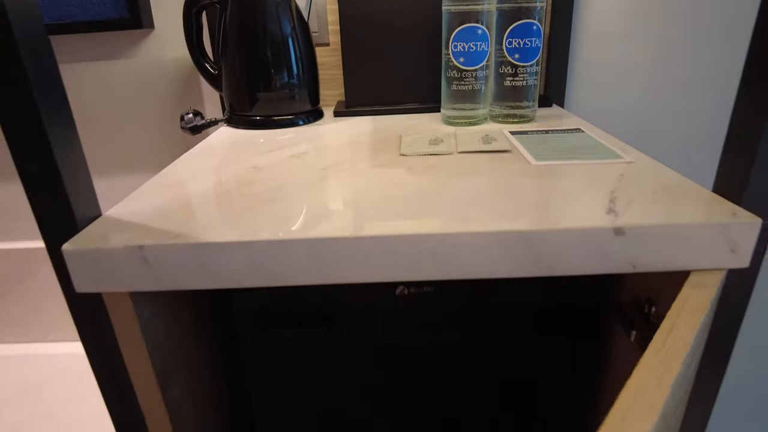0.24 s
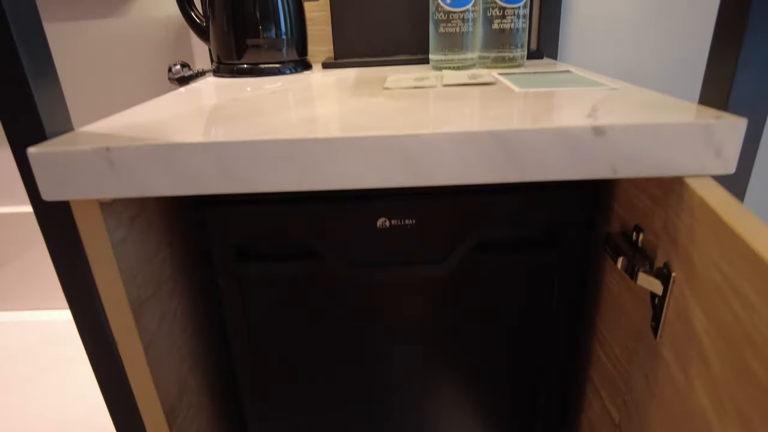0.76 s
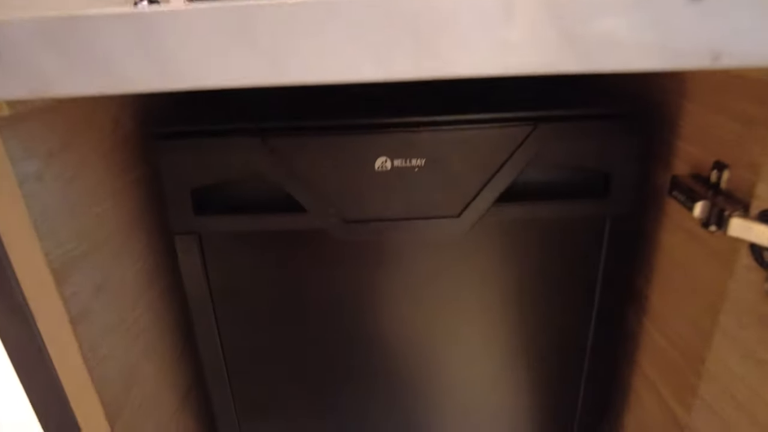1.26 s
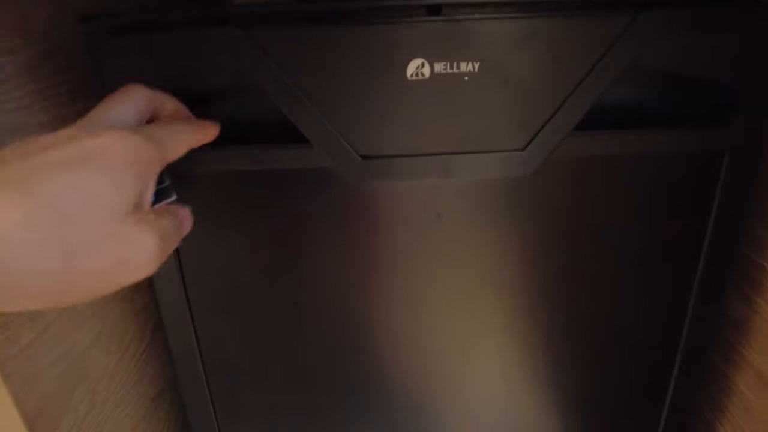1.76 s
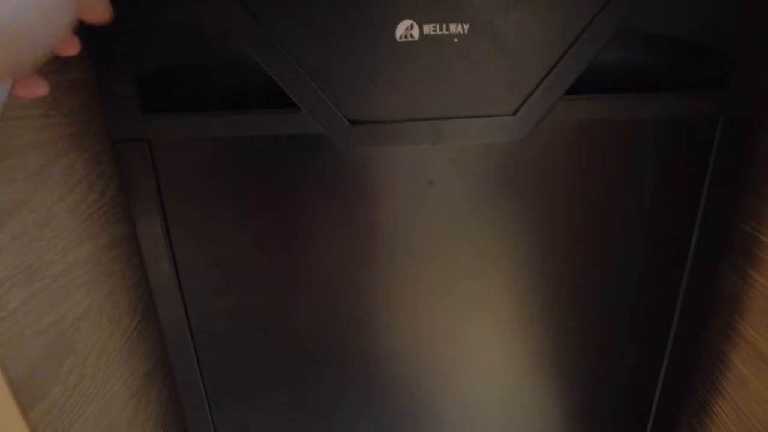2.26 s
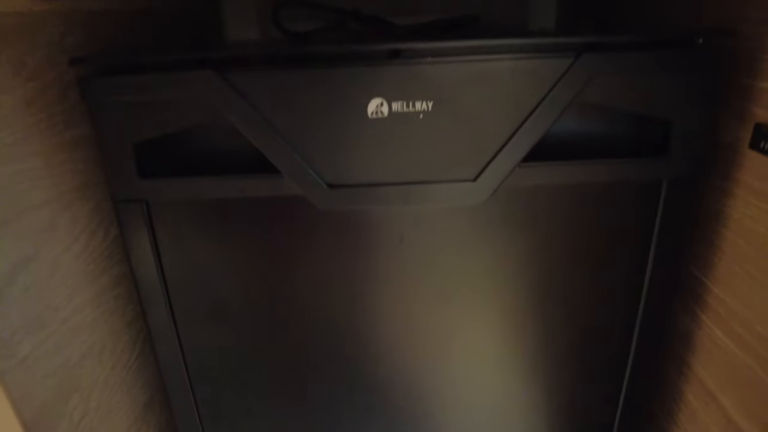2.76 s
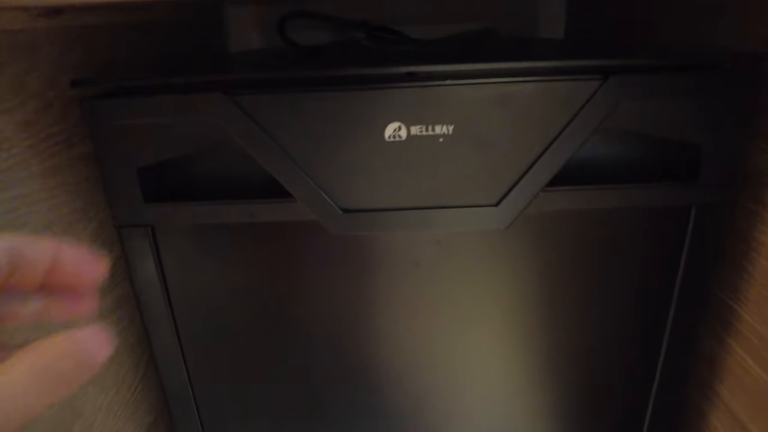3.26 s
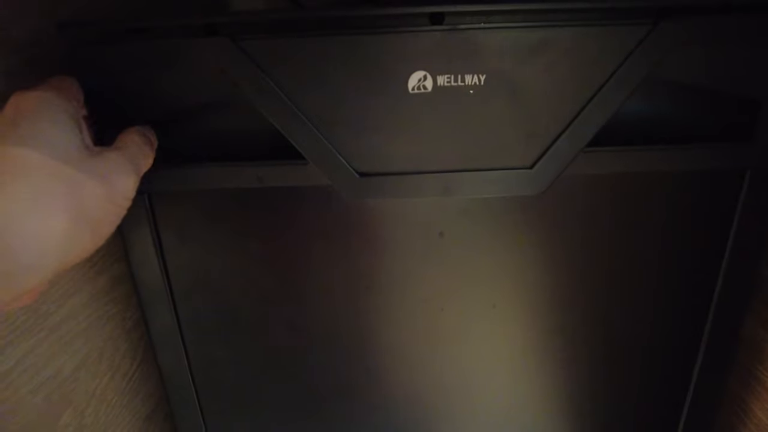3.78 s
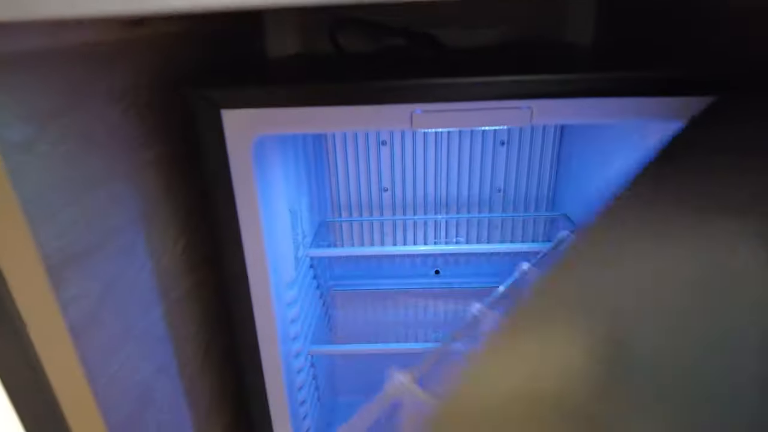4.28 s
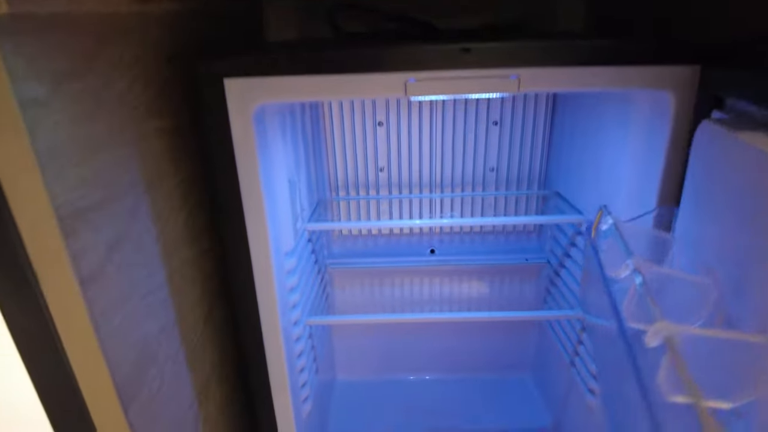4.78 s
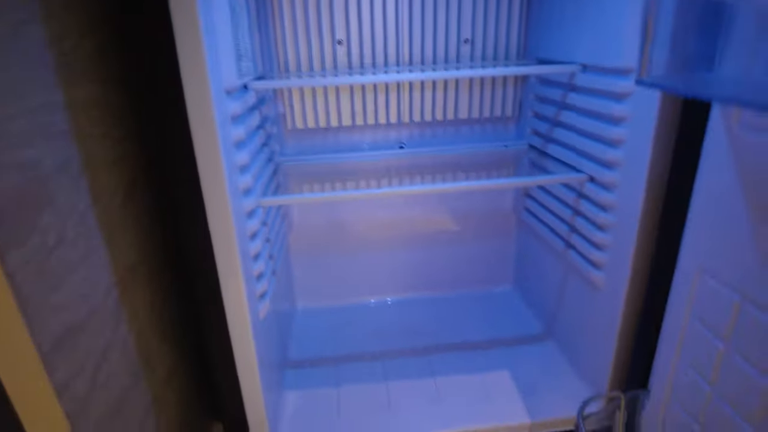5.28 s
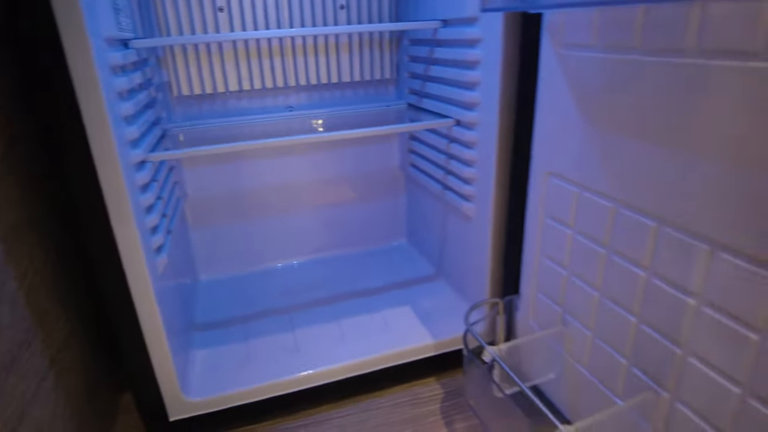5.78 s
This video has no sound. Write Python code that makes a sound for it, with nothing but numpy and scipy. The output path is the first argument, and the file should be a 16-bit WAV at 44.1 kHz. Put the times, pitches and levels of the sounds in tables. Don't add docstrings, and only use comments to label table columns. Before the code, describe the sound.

A hand fumbles at a small fridge in a wooden cabinet: hollow thuds, plastic clicks and short scrapes over low ventilation rumble.

```python
import sys
import numpy as np
from scipy import signal
from scipy.io import wavfile
from scipy.ndimage import uniform_filter1d

SR = 44100
rng = np.random.default_rng(int(sys.argv[2]) if len(sys.argv) > 2 else 0)


def boost(x):
    u = np.asarray(x, float) / 20
    return 10 ** u


def unload_audio(sound):
    columns = np.transpose(np.atleast_2d(sound))
    steps = np.round(np.clip(columns, -1, 1) * 32767)
    wavfile.write(sys.argv[1], SR, steps.astype(np.int16))


N = 266220

# [f/Hz, width/Hz, level/dB]
GRIP = [(1240, 176, 3), (1653, 310, 2.5), (2183, 153, 0), (2360, 240, -2), (2830, 500, -2.5),
        (3590, 350, -6), (4354, 360, -3.5), (5940, 570, -1.5), (8650, 1050, -11)]
# [f/Hz, likeness 0-1]
LIKENESS = [(30, 0.98), (125, .98), (300, 0.86), (600, 0.2), (1200, 0.4), (2500, 0.52), (5000, 0.2),
            (15000, 0)]


def level(x, db):
    return x * boost(db) / np.sqrt(np.mean(x ** 2))


def peak(x, db):
    return x * boost(db) / np.max(np.abs(x))


def on_log(hz, table):
    f_hz, value = np.transpose(table)
    return np.interp(np.log(hz), np.log(f_hz), value)


def curves(table):
    s, *columns = np.transpose(table)
    return (np.interp(np.arange(N) / SR, s, c) for c in columns)


def band(x, hz, width_hz):
    return signal.lfilter(*signal.iirpeak(min(hz, 0.45 * SR), hz / width_hz, fs=SR), x)


def cut(x, low_hz, high_hz):
    edges_hz = [low_hz, min(high_hz, 0.45 * SR)]
    return signal.sosfilt(signal.butter(2, edges_hz, "bandpass", fs=SR, output="sos"), x)


def body(force, modes):
    return sum((-1) ** k * boost(db) * band(force, hz, width_hz)
               for k, (hz, width_hz, db) in enumerate(modes))


def alike(x, likeness):
    c = np.clip(likeness, -0.99, 0.99)
    return np.sqrt(1 + c) * x[0] + np.sqrt(1 - c) * x[1] * np.array([[1], [-1]])


def walk(rate_hz):
    hold = int(SR / rate_hz)
    steps = rng.standard_normal(N // 256)[np.arange(N) // hold]
    return 2.93 * uniform_filter1d(uniform_filter1d(steps, hold), hold)


def fade(t, t60_s):
    return np.exp(-np.log(1000) * t / max(t60_s, 0.003))


def swells(s, db, fade_s, rise):
    t = np.arange(0, N / SR, 0.001)[:, None]
    away_s = np.maximum(t - s, (s - t) / rise)
    each = boost(db - 20 * away_s / np.maximum(fade_s, 0.005))
    return np.interp(np.arange(N) / SR, t[:, 0], each.sum(axis=1))


def grains(rate_hz, spread_db):
    chance = rng.random((2, 2, N))
    jerks = chance[0] < rate_hz / SR
    size = boost(-spread_db * np.log(1 - 0.98 * chance[1]))
    return jerks * size * rng.choice([-1, 1], (2, N))


def add(out, s, x):
    i = int(s * SR)
    x = x[..., :N - i]
    out[:, i:i + x.shape[-1]] += x


def door(force):
    # [f/Hz, width/Hz, level/dB]
    panel_modes = [(136, 29.7, -6.5), (199, 13.7, -1.5), (248, 15.7, -8), (304.6, 32.8, -3), (401, 50, -7),
                   (500, 44, -11), (590, 71, -14.5), (724, 36, -17), (842, 38, -15)]
    return sum((-1) ** k * boost(db) * alike(band(force, hz, width_hz), on_log(hz, LIKENESS))
               for k, (hz, width_hz, db) in enumerate(panel_modes))


def thuds():
    # [t/s, boom/dB, panel f/Hz, panel/dB, boom t60/s]
    blows = [(0.0, -47, 139, -55, 0.12), (0.56, -48, 190, -50, 0.085), (1.342, -26.5, 240, -39.5, 0.25),
             (1.567, -31, 250, -53, 0.14), (1.608, -34, 178, -53, 0.16), (1.81, -16.5, 202, -34.5, 0.08),
             (1.824, -23, 255, -39, 0.07), (1.973, -44, 202, -45.5, 0.24), (2.01, -41, 283, -42.5, 0.042),
             (2.195, -62, 223, -42.5, 0.091), (2.298, -35.5, 202, -55.5, 0.08),
             (2.494, -27, 248, -47.5, 0.12), (2.939, -56, 176, -51, 0.04), (3.531, -34.5, 199, -65, 0.056),
             (3.63, -34.5, 214, -52.5, 0.086), (3.818, -36, 202, -45, 0.082),
             (3.894, -35, 199, -36.5, 0.21), (3.935, -44, 195, -41, 0.2), (3.978, -45, 270, -45, 0.085),
             (4.079, -52, 207, -54, 0.15), (5.748, -35, 184, -44, 0.062), (5.768, -37, 194, -49.5, 0.24),
             (1.842, -34, 193, -41, .25)]
    out, t = np.zeros((2, N)), np.arange(SR // 2) / SR
    for s, boom_db, panel_hz, panel_db, t60_s in blows:
        boom_hz = 66.6 * 0.72 ** np.log2(t60_s * 10)
        boom = np.sin(2 * np.pi * boom_hz * t) * fade(t, t60_s) * (1 - np.exp(-t / 0.0011))
        shake = uniform_filter1d(rng.standard_normal((2, len(t))), 20)
        shake = shake * fade(t, 0.44 * t60_s) * (1 - np.exp(-t / 0.0043))
        panel = 2.2 * band(shake[0], panel_hz, 35) + door(shake)
        add(out, s + 0.003065, peak(boom, boom_db) + peak(panel, panel_db + 10))
    return out


def rubbing():
    # [t/s, effort/dB]
    hands = [(0, -67), (.5, -64.5), (.8, -65), (1.1, -60.5), (1.3, -67.5), (1.8, -64), (2.3, -66),
             (2.7, -65.5), (3.1, -64), (3.5, -69.5), (3.75, -61.5), (4.3, -72), (4.7, -68.5), (5.0, -77.5),
             (5.4, -73.5), (5.7, -70.5), (6.04, -72)]
    # [t/s, effort/dB, time to fade 20 dB/s]
    slips = [(1.834, -46, .12), (1.885, -48, .1), (1.972, -51, 0.08), (1.998, -49, 0.07),
             (2.023, -52, 0.07), (2.191, -55, 0.06), (2.329, -65, 0.02), (2.479, -57, -0.27),
             (2.96, -61.5, -0.16), (3.81, -58, 0.05), (3.852, -55.5, 0.04), (3.893, -50, .14),
             (3.939, -49, .14), (3.985, -61, 0.03), (4.03, -60, 0.02), (4.083, -51, .22), (4.16, -69, -0.1),
             (4.221, -62.5, 0.17), (1.36, -58.5, 0.1), (1.139, -64.5, -0.03), (5.77, -68.5, 0.8)]
    effort_db = 20 * np.log10(boost(*curves(hands)) + swells(*np.transpose(slips), rise=0.29))
    over_db = effort_db + 65
    shake_db, rumble_db = -54 + 1.055 * over_db, -50.5 + 0.8 * over_db

    scrape = alike(cut(body(grains(900, 1.47), GRIP), 870, 3680), 0.38)
    scrape = level(scrape, 0) * boost(effort_db + 0.7 * walk(30) - 4)
    shake = level(door(grains(600, 1.04)), 0) * boost(shake_db + 0.6 * walk(17) - 8)
    rumble = level(alike(cut(grains(300, 2.0), 23.4, 99), 0.97), 0) * boost(rumble_db - 6)
    return scrape + shake + rumble


def cloth():
    # [t/s, swish/dB, time to fade 20 dB/s, brightness/dB]
    brushes = [(0.0, -73, 0.8, 6), (.19, -59.5, 0.21, -1.5), (.57, -69, 0.2, -3), (.69, -63, 0.33, 0),
               (1.07, -62, 0.87, 3.5), (1.13, -55, -0.06, 22), (1.36, -54, -0.08, 3), (1.74, -68, .5, 0),
               (1.83, -50.5, 0.0328, 6), (1.9, -54.5, 0, -9), (1.979, -55, 0.11, 3), (2.15, -57.5, 0.08, 1),
               (2.37, -73, 0.15, 15), (2.49, -71.5, 0.26, -3), (2.69, -63.5, 0.25, 0),
               (2.88, -59.5, 0.28, -2), (2.919, -48, 0.0262, 7), (2.961, -55.5, 0.0247, -9),
               (3.532, -55, -0.1, 20), (3.628, -59.5, 0.11, 4), (3.84, -62, .5, 10.5),
               (4.07, -80, -0.1, -1.5), (4.93, -90, 0.86, -8), (5.082, -62, 0.5, 5), (5.61, -82, 0.5, 18),
               (5.75, -71.5, 0.8, -3)]
    rise, rest_db = 0.39, -86
    s, db, fade_s, bright_db = np.transpose(brushes)
    fibres = grains(6000, 3.2)
    dull = level(alike(cut(fibres, 2930, 9480), 0.053), -5)
    bright = level(alike(cut(fibres, 6700, 16050), 0.029), -7.5)
    dull_gain = boost(rest_db) + swells(s, db - bright_db / 2, fade_s, rise)
    bright_gain = boost(rest_db) + swells(s, db + bright_db / 2, fade_s, rise)
    return dull * dull_gain + bright * bright_gain


def air():
    # [f/Hz, density/dB per Hz]
    spectrum = [(12, -30), (20, 6), (38, 4), (70, -6.5), (138, -10), (310, -17.5), (347, -17), (388, -20.5),
                (624, -30), (780, -28.5), (1090, -31), (1190, -53), (1480, -36), (3440, -55), (16000, -51)]
    # [t/s, level/dB]
    shelter = [(0, 1.5), (2.5, 1.5), (3.3, 0), (4.5, 4), (5.1, -0.5), (5.6, -0.5), (6.04, 2.5)]
    out, swell_db = 0, 0.4 * walk(0.7)
    for hz in 22 * 2 ** np.arange(0, 9.6, 0.5):
        noise = band(band(rng.standard_normal((2, N)), hz, hz / 2), hz, hz / 2)
        gain = boost(on_log(hz, spectrum) + swell_db + 1.25 * walk(8))
        out = out + gain * alike(noise, on_log(hz, LIKENESS))
    return level(out, -49.5) * boost(*curves(shelter))


def clicks():
    # [t/s, peak/dB, ring f/Hz, treble
    # crack/dB, ring over rattle/dB]
    contacts = [(0.176, -36, 1580, -52, -8), (0.56, -40.5, 570, -58, -1.5), (1.163, -48, 1670, -54, 9),
                (1.351, -40, 1280, -54, 5.5), (1.829, -28, 1240, -46.5, -7), (1.994, -40.5, 592, -72, 3),
                (2.132, -44.5, 640, -66, 7.5), (2.186, -40, 1590, -61, 12.5), (2.199, -49, 960, -71, 14),
                (2.244, -53, 595, -59, 4), (2.356, -47.5, 1620, -67, 10), (2.464, -54, 1510, -84, 10),
                (2.501, -57, 1450, -86, 11), (3.893, -35.5, 870, -57, -1), (3.954, -62, 595, -59, -4),
                (3.979, -54, 700, -77.5, -14), (4.027, -47, 1380, -57, -1), (4.085, -44, 1510, -76, 11),
                (4.129, -52, 680, -88, 16), (4.215, -49, 1370, -72, -5), (5.745, -40, 806, -70, -7.5),
                (5.764, -51, 770, -72, 16), (1.352, -43, 520, -77, 10), (3.85, -44.5, 1280, -72, 10),
                (1.4537, -46.5, 2850, -88, -4), (1.8127, -24, 2520, -39, 2), (1.847, -41, 2460, -65, 12),
             (1.8863, -34, 2320, -75, 4), (1.9678, -41, 2470, -68, 0), (2.027, -43, 2610, -65, 11),
             (2.148, -49, 2940, -72, 1), (2.4768, -52.5, 2180, -59, -20), (2.9112, -36.5, 1570, -36, 6),
             (2.9611, -45, 2360, -48, 8), (3.6306, -45.5, 2460, -54, 4.5), (3.808, -48.5, 2730, -56.5, 5),
             (3.8187, -47, 2150, -55, 2), (3.8489, -43, 2980, -53, -4), (3.934, -41.5, 2670, -62, 5.5),
             (4.08, -41.5, 2580, -59, 6.5), (4.77, -47.5, 3080, -77, 1), (4.918, -47, 4530, -59, 5.5),
             (4.9745, -73, 2410, -58.5, 3), (5.404, -54.5, 2750, -85, -2), (5.5933, -59.5, 1920, -66, -11),
             (5.7617, -46, 1980, -65, 7), (2.9122, -36, 2310, -45, 13.5), (5.7454, -44.5, 1960, -67, 0)]
    port_lag = 3
    out, t = np.zeros((2, N)), np.arange(SR // 4) / SR
    touch = 1 - np.exp(-t / 0.00019)
    for s, db, hz, crack_db, ring_db in contacts:
        t60_s = 0.059 * 0.68 ** np.log2(hz / 1000)
        force = rng.standard_normal((4, len(t))) * touch
        lump_db = 5 * rng.standard_normal(len(t) // 128 + 1)
        lumps = boost(np.repeat(lump_db, 128)[:len(t)])

        spot = band(band(force[0] * fade(t, 0.62 * t60_s), hz, 4.9 * hz), hz, 0.14 * hz)
        push = fade(t, 0.3 * t60_s) + 0.35 * lumps * fade(t, 1.6 * t60_s)
        grip = cut(body(force[1] * push, GRIP), 500, 12000)
        ring = peak(spot, db - 1.5 + ring_db / 2) + peak(grip, db - 2.5 - ring_db / 2)

        crack = alike(cut(force[2:], 4200, 17000), 0.45)
        crack = crack * (fade(t, 0.006) + 0.13 * lumps * fade(t, 1.8 * t60_s))
        add(out, s - 0.0005, np.array([ring, np.roll(ring, port_lag)]) + peak(crack, crack_db + 9))
    return out


def room(x):
    # [f/Hz, t60/s]
    decay = [(100, 0.2), (500, 0.4), (2000, 0.3), (6000, 0.11), (14000, 0.04)]
    t = np.arange(SR // 2) / SR
    tail = 0
    for hz in 60 * 2.0 ** np.arange(9):
        noise = band(band(rng.standard_normal((2, len(t))), hz, hz), hz, hz)
        tail = tail + alike(noise, on_log(hz, LIKENESS)) * fade(t, on_log(hz, decay))
    tail = tail * (1 - np.exp(-t / 0.001))
    tail = tail / np.sqrt(np.sum(tail ** 2) / 2)
    mono = x.mean(axis=0, keepdims=True)
    return boost(-7.5) * signal.fftconvolve(mono, tail, axes=1)[:, :N]


def scene():
    hits = thuds() + clicks()
    return hits + room(hits) + rubbing() + cloth() + air()


def mute_faint_bands(x):
    # [f/Hz, room a steady band has before it is muted/dB]
    gate = [(3300, 3), (5000, 0.5), (8000, -0.9), (12000, -6), (14500, -6.5), (15600, 3)]
    frame, top_hz = 512, 15850
    hz, _, z = signal.stft(x, SR, nperseg=2 * frame)
    edges = np.searchsorted(hz, np.linspace(3300, top_hz, 23))
    for low, high in zip(edges[:-1], edges[1:]):
        db = 10 * np.log10(np.mean(np.abs(z[:, low:high]) ** 2, axis=(0, 1)) + 1e-18)
        rise_db = db - uniform_filter1d(db, size=25) + 0.24 * (db - np.median(db))
        whim_db = 4 * np.resize(walk(35)[::frame], len(db))
        over_db = rise_db + whim_db + on_log(hz[low], gate)
        z[:, low:high] *= 0.036 + 1 / (1 + np.exp(-np.clip(3 * over_db, -30, 30)))
    top = np.abs(z[:, edges[-1]:]).mean(axis=(0, 1))
    z[:, edges[-1]:] *= top ** 4 / (top ** 4 + boost(-85) ** 4)
    return signal.istft(z, SR)[1][:, :N]


def low_pass(x):
    return signal.sosfilt(signal.butter(12, 17000, fs=SR, output="sos"), x)


def record(dry):
    x = signal.sosfilt(signal.butter(1, 18, "highpass", fs=SR, output="sos"), dry)
    return low_pass(mute_faint_bands(x))


dry = scene()
out = record(dry)
unload_audio(out)
```